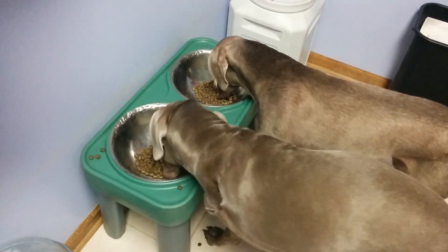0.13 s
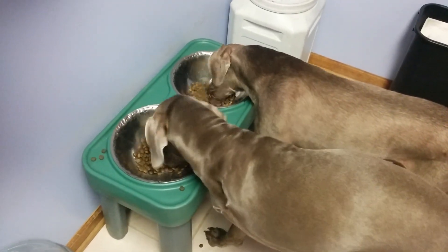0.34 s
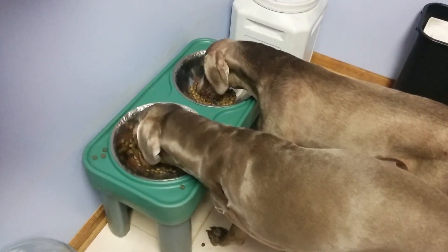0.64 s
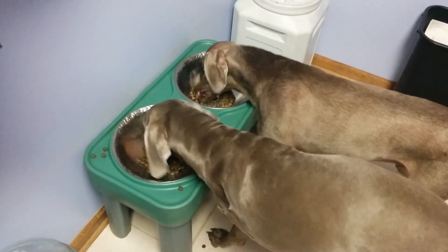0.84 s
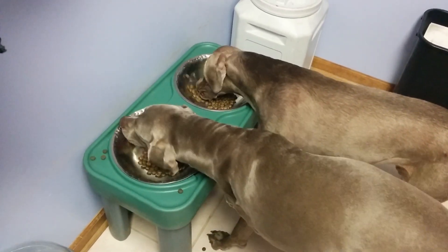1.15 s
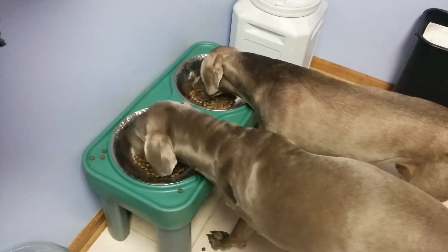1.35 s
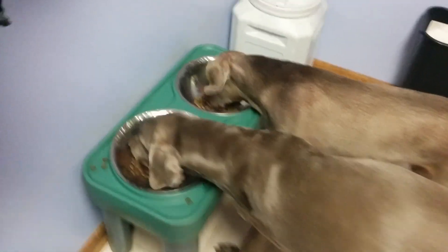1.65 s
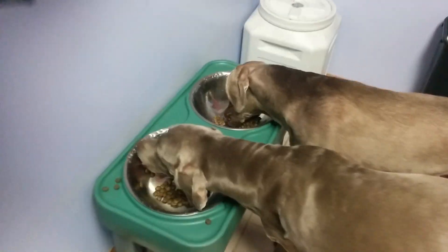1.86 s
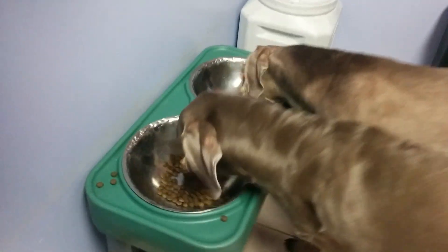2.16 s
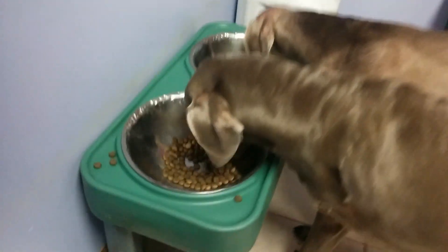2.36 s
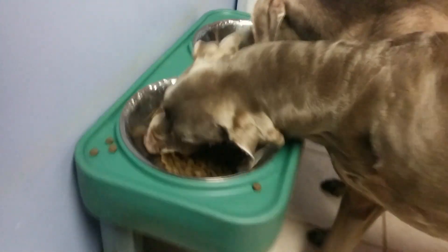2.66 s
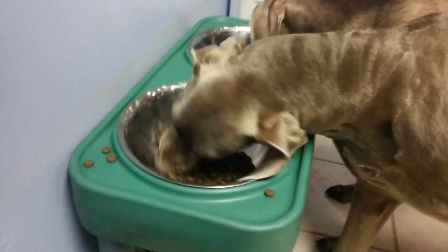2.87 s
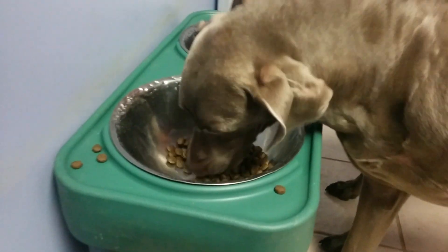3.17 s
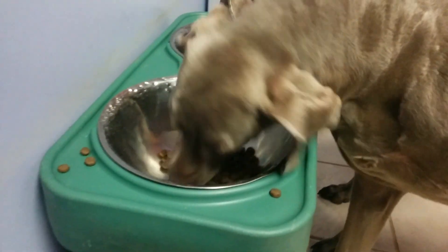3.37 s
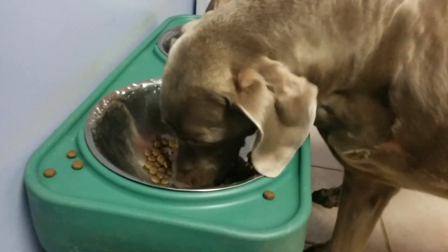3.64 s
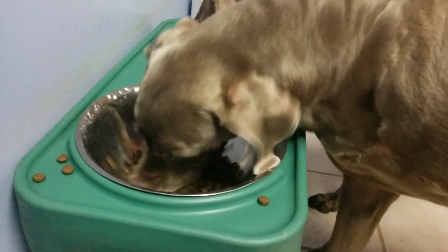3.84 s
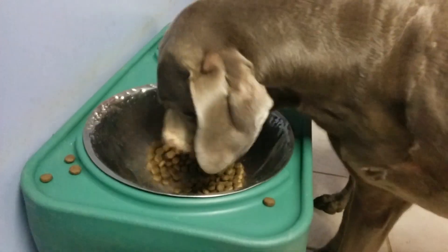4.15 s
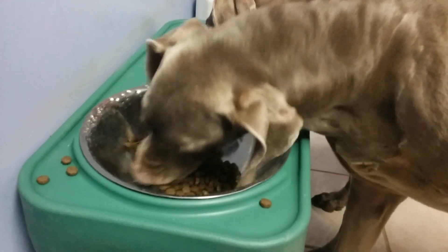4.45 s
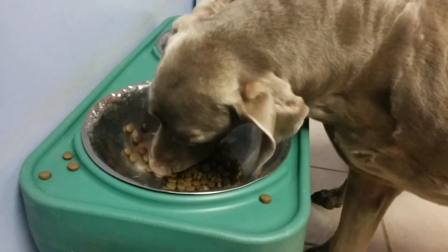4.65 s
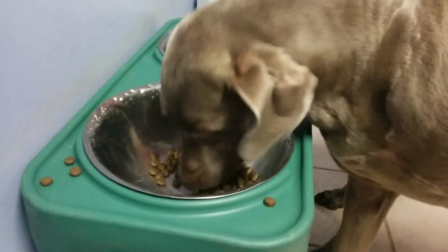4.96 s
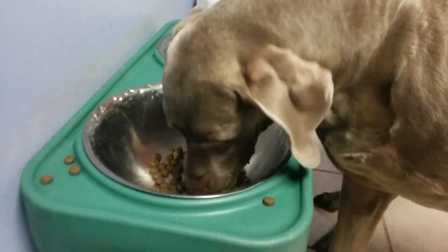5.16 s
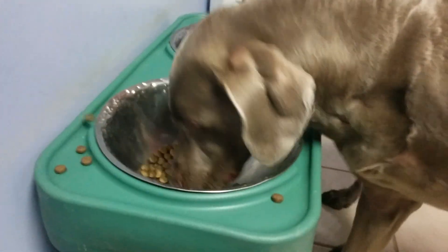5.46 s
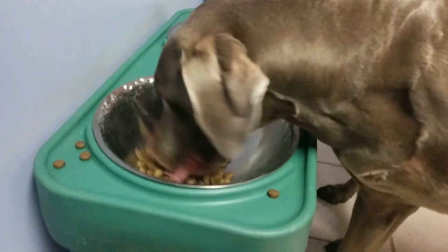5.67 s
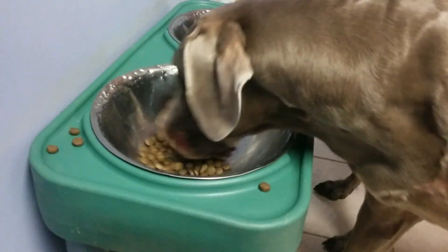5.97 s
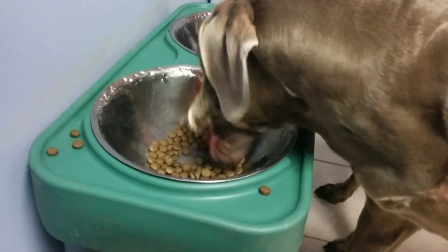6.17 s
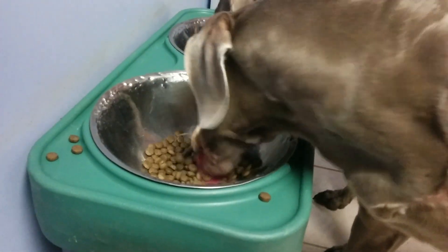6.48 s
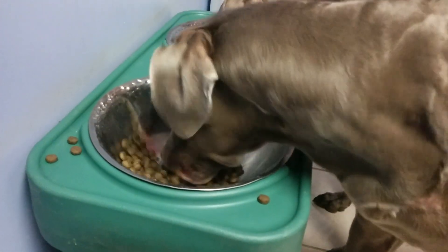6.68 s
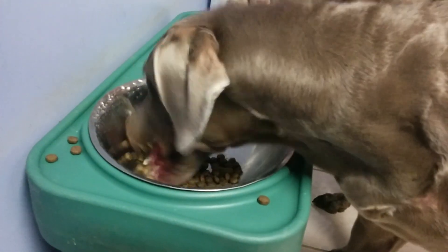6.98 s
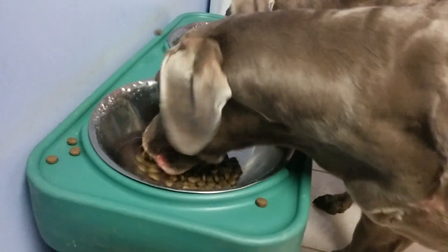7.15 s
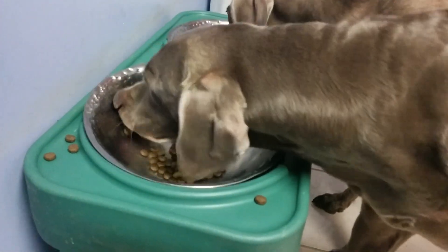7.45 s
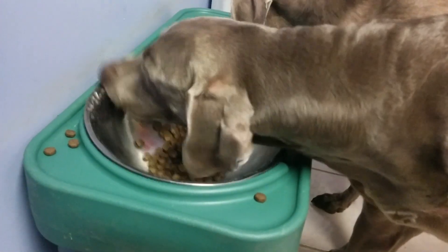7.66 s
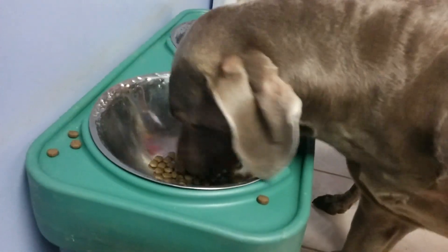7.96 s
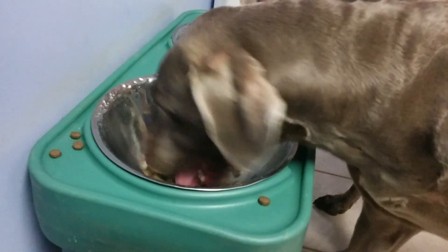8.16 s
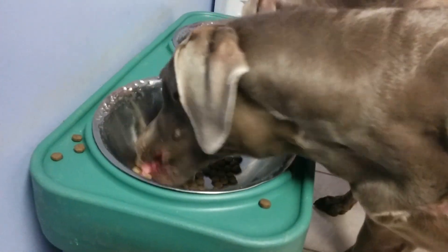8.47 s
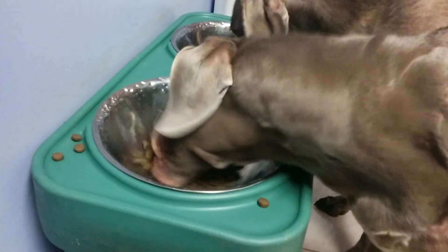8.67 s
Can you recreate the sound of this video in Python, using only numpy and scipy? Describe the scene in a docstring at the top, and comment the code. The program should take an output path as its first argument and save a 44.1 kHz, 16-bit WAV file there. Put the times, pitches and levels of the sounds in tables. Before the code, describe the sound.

Dogs eat dry kibble hurriedly from steel bowls in a hollow plastic stand, for almost nine seconds. From the start, uneven bursts of rattling pellets and dull hollow thumps follow one another several times a second, each short and damped, with grainy rubbing. Small crisp cracks dot the first two seconds; brief softer gaps fall near 0.6 and 1.4-1.6, then firmer bumps at 1.7-2.0. Around 3.0 the crunching becomes brighter and denser, with a sharp crack near 4.0 and another near 4.95, amid strong knocks at 4.5-5.3. Rattling shoves continue unevenly, with a hard bump at 6.4 and a cluster of bright crunches at 7.1-7.4. Activity loosens slightly around 8.3-8.5, then a strong clattering thump arrives near 8.75. The microphone is close, in a small tiled room with a short echo; the background hush is barely audible and drops down in pauses.

```python
"""Dogs gobble dry kibble from steel bowls, their muzzles thumping the hollow stand throughout.
Bumps ring the plastic, shoved pellets rattle the steel: random contacts excite resonant modes.
Rubbing and cracking pellets are short-ringing fragments; a small tiled room's echo and a faint hush lie behind.
A close microphone with a noise suppressor and softly clipping peaks hears it."""
import sys
import numpy as np
from scipy import signal
from scipy.io import wavfile
from scipy.ndimage import uniform_filter1d

SR = 44100
rng = np.random.default_rng(int(sys.argv[2]) if len(sys.argv) > 2 else 0)


def output_pcm(signal):
    """Save a mono or channel-first signal as 16-bit PCM at the path in sys.argv[1].

    Samples are clipped to [-1, 1] before scaling.
    """
    pcm = np.clip(np.atleast_2d(signal).T, -1, 1) * 32767
    wavfile.write(sys.argv[1], SR, np.round(pcm).astype(np.int16))


N = 388962

# single pellets cracking: start_s, level_db, loudest_hz, length_s
PELLET_CRACKS = [(0.064, -19.5, 6300, 0.038), (0.306, -20, 5300, 0.045), (0.725, -22, 5270, 0.11),
                 (0.811, -16, 5200, 0.022), (1.336, -25, 3500, 0.04), (1.749, -13, 5270, 0.044),
                 (1.92, -24, 5500, 0.044), (2.191, -24.5, 5700, 0.046), (2.453, -14.5, 4500, 0.017),
                 (2.575, -24.5, 5300, 0.11), (2.662, -21.5, 5100, 0.057), (2.735, -23, 5400, 0.06),
                 (2.817, -15, 5200, 0.045), (3.02, -12, 5950, 0.04), (3.145, -13, 5600, 0.037),
                 (3.19, -17, 4150, 0.05), (3.557, -19, 5200, 0.042), (3.72, -19, 4900, 0.038),
                 (4.034, -7, 5250, 0.02), (4.18, -29.5, 5800, 0.035), (4.272, -12, 4100, 0.029),
                 (4.415, -16, 5850, 0.058), (4.614, -13, 6200, 0.018), (4.816, -20, 5200, 0.022),
                 (4.863, -16, 4000, 0.03), (4.958, -8, 5600, 0.026), (5.266, -14, 5200, 0.033),
                 (5.512, -15.5, 5300, 0.017), (5.668, -19.5, 5900, 0.023), (5.922, -16, 5300, 0.03),
                 (6.383, -15, 5340, 0.052), (6.742, -12.5, 5500, 0.037), (6.957, -20, 5440, 0.056),
                 (7.108, -11, 6200, 0.029), (7.155, -9, 5800, 0.03), (7.358, -11, 3760, 0.034),
                 (7.52, -18, 5100, 0.07), (7.593, -16.5, 6400, 0.03), (8.097, -14, 6380, 0.04),
                 (8.229, -13.5, 4550, 0.028), (8.393, -21, 5800, 0.032), (8.658, -16, 5130, 0.066)]
# modes of the hollow plastic stand: mode_hz, level_db, t60_s
STAND_MODES = [(72.4, -2.5, 0.13), (128, -7, 0.047), (158.8, 1, .1), (212.4, 0, 0.094), (243, -7, 0.045),
               (288.8, -2.5, 0.17), (375.7, -10, 0.15), (416, -2, 0.038), (470.2, -4.5, 0.14),
               (535.3, -1.5, 0.053), (615, -2, 0.033), (720, -5, 0.017)]
# modes of the steel bowl, damped by food: mode_hz, level_db, t60_s
BOWL_MODES = [(844, 4, 0.02), (1064, 3, 0.02), (1241, 2, 0.016), (1448, -0.5, 0.018), (1607, 3.5, 0.017),
              (1777, 2, 0.038), (1924, 2.5, 0.016), (2137, -1, 0.02), (2460, -5, 0.019), (2706, 2, 0.024)]
# colour of breaking and rubbing pellets: colour_hz, level_db
PELLET_COLOUR = [(2900, -1.5), (3650, -0.5), (4300, -2), (4900, -5), (5600, 2), (6300, 3.5), (7500, -3),
                 (10400, -5), (12500, -11.5), (15800, -32)]
# shoves of muzzle and tongue through the food:
# start_s, bowl_level_db, stand_re_bowl_db, length_s (before each body's share), stand_loudest_hz, bowl_loudest_hz
FOOD_SHOVES = [(0.001, -12, 4, 0.045, 284, 1130), (0.072, -19, -4, 0.034, 450, 2570),
               (0.15, -34, -17, 0.099, 450, 1510), (0.216, -16.5, 6.5, 0.07, 430, 1250),
               (0.261, -9, 5, 0.11, 377, 1700), (0.33, -12.5, -3, 0.13, 300, 1210),
               (0.397, -11.5, 7.5, 0.062, 252, 1360), (0.441, -10, 1.5, 0.07, 220, 1220),
               (0.613, -34, -4, 0.05, 400, 1200), (0.68, -28, -26, 0.12, 590, 1920),
               (0.761, -10, 4, 0.073, 280, 1400), (0.808, -11, 10.5, 0.093, 200, 1650),
               (1.023, -22.5, 0, 0.11, 440, 1520), (1.065, -12, 8.5, 0.094, 268, 1810),
               (1.148, -13.5, -8, 0.12, 280, 1970), (1.221, -10, 2, 0.09, 590, 880),
               (1.335, -15, -8, 0.03, 490, 2000), (1.383, -31.5, 7, 0.05, 570, 1490),
               (1.494, -30, -6, 0.07, 560, 900), (1.507, -36, 14, 0.045, 160, 990),
               (1.617, -22, -14, 0.063, 550, 1900), (1.69, -8, 4.5, 0.11, 430, 1210),
               (1.847, -7, 5.5, 0.086, 314, 1210), (2.01, -11.5, 5.5, 0.091, 360, 1520),
               (2.155, -37.5, 14, 0.093, 220, 1000), (2.22, -25, -2.5, 0.11, 560, 1070),
               (2.263, -10, 1.5, 0.14, 219, 1710), (2.357, -12.5, -9, 0.081, 170, 1530),
               (2.414, -19, 3.5, 0.073, 222, 1410), (2.601, -25.5, -2.5, 0.073, 541, 1630),
               (2.664, -23.5, -21, 0.086, 570, 1560), (2.775, -13, 9.5, 0.18, 340, 1300),
               (2.884, -10, -1, 0.12, 250, 1150), (2.962, -16.5, 4, 0.08, 220, 1310),
               (3.019, -7.5, 1.5, 0.07, 560, 1530), (3.069, -10.5, 7, 0.098, 410, 1390),
               (3.14, -8.5, -4, 0.094, 338, 1830), (3.28, -26.5, -12, 0.054, 240, 1100),
               (3.361, -22, -23, 0.062, 540, 1540), (3.412, -26.5, 2, 0.041, 160, 1550),
               (3.516, -23.5, -2, 0.047, 590, 1540), (3.555, -14, 3, 0.04, 420, 1550),
               (3.589, -10.5, 6, 0.12, 490, 1080), (3.668, -12, -3, 0.098, 200, 1580),
               (3.805, -20.5, -8, 0.11, 510, 1300), (3.883, -31.5, 6, 0.19, 530, 1330),
               (3.942, -9, 8, 0.079, 523, 1240), (3.995, -10.5, 6, 0.084, 490, 1780),
               (4.148, -26, -12, 0.061, 280, 1700), (4.27, -21, -7, 0.092, 514, 1210),
               (4.339, -22, -1, 0.12, 250, 1560), (4.442, -21, 13, 0.034, 430, 1030),
               (4.464, -6.5, 4.5, 0.12, 483, 1310), (4.53, -12, 6.5, 0.032, 350, 1620),
               (4.658, -11, 9.5, 0.11, 254, 1060), (4.734, -11.5, -5, 0.088, 370, 1440),
               (4.86, -8, 7.5, 0.064, 510, 1160), (4.906, -9, 3.5, 0.057, 446, 1560),
               (4.941, -8, -8.5, 0.079, 380, 1700), (5.059, -19.5, -20, 0.066, 272, 1710),
               (5.193, -26.5, 12, 0.012, 180, 1130), (5.235, -19, -3, 0.029, 390, 1180),
               (5.263, -6, 2.5, 0.065, 218, 1120), (5.3, -10.5, 3, 0.14, 221, 1440),
               (5.41, -11, 5.5, 0.11, 221, 1520), (5.474, -11, 4, 0.076, 170, 1730),
               (5.61, -16.5, -9, 0.13, 640, 1440), (5.708, -17, -12.5, 0.063, 580, 1700),
               (5.764, -20, -6.5, 0.052, 483, 1730), (5.862, -22.5, -8, 0.11, 560, 1500),
               (5.902, -10, 8, 0.075, 223, 1430), (5.968, -10.5, 3, 0.099, 376, 1230),
               (6.142, -23, -18, 0.063, 533, 1590), (6.311, -22.5, -9.5, 0.05, 580, 2260),
               (6.372, -15.5, 5.5, 0.026, 240, 1320), (6.392, -6, 2, 0.065, 218, 1810),
               (6.501, -21, -9, 0.078, 180, 1680), (6.633, -19.5, -10, 0.086, 470, 1230),
               (6.671, -9, 1.5, 0.13, 200, 1580), (6.744, -8.5, -1.5, 0.066, 400, 1650),
               (6.87, -26.5, -6.5, 0.073, 200, 1330), (6.957, -17, -10.5, 0.099, 550, 1420),
               (7.093, -15.5, -20, 0.051, 530, 1750), (7.129, -13.5, 1.5, 0.059, 380, 1400),
               (7.177, -12, 4, 0.085, 440, 1320), (7.322, -13.5, -3, 0.15, 308, 1930),
               (7.438, -12.5, -2.5, 0.057, 526, 1150), (7.542, -21, 14, 0.087, 266, 1430),
               (7.645, -22.5, -1, 0.06, 382, 1270), (7.728, -26, -5.5, 0.11, 540, 2480),
               (7.824, -19, 6, 0.16, 458, 1150), (7.902, -9, 5, 0.15, 288, 1190),
               (8.003, -17, -2, 0.1, 220, 1610), (8.09, -19.5, 6.5, 0.063, 553, 1400),
               (8.213, -10, -25, 0.014, 560, 1070), (8.221, -13, -30, 0.045, 577, 2050),
               (8.29, -34, -8, 0.15, 520, 1700), (8.37, -32, -15, 0.03, 560, 1780),
               (8.389, -17.5, -30, 0.045, 560, 1740), (8.577, -15.5, 4, 0.2, 210, 1140),
               (8.713, -13, 6, 0.07, 410, 1120), (8.762, -6, 5, 0.074, 410, 1420)]

ENVELOPE_STEP_SAMPLES = 8
HUSH_DB = -61   # before the suppressor
ROOM_T60_S, ROOM_DB = 0.27, -10
STAND_LENGTH_SHARE, BOWL_LENGTH_SHARE, RUB_LENGTH_SHARE = 0.77, 0.94, 0.93
FOCUS_PER_DB = 0.0162   # weak events spread over more modes
RUB_HZ, RUB_DB = 4160, -8   # pellets rubbing under every shove
RUB_LAG_S = 0.0057   # the heap starts to slide just after the muzzle lands
GRIT_DB_PER_OCT, MID_BOWL_HZ = 2.5, 1500   # shoves that ring the bowl high rub more pellets
GRIT_DB_PER_DB = 0.2   # light shoves hardly rub the pellets
SUPPRESS_BELOW_DB, SUPPRESS_DB_PER_DB = -51, 0.47   # threshold at 1 kHz
SOFT_CLIP_TOP = 0.68   # full scale = 1
CUTOFF_HZ = 16000


def from_db(db):
    """Decibels to amplitude gain."""
    return 10 ** (np.asarray(db) / 20)


def rms_one(x):
    """Scale to rms 1."""
    return x / np.sqrt(np.mean(x ** 2) + 1e-20)


def drift(corner_hz):
    """Slow random wander, one value per envelope step, rms 1."""
    r = np.exp(-2 * np.pi * corner_hz * ENVELOPE_STEP_SAMPLES / SR)
    noise = rng.standard_normal(N // ENVELOPE_STEP_SAMPLES + 1)
    return rms_one(signal.lfilter([1], [1, -2 * r, r * r], noise))


def grains(per_s, spread_db):
    """Random tiny contacts of uneven size and sign."""
    size_db = spread_db * np.minimum(rng.exponential(1, N), 4)
    sizes = from_db(size_db) * rng.choice([-1, 1], N)
    return sizes * (rng.random(N) < per_s / SR) + 1e-18


def shoves(extra_db, loudest_hz, length_share):
    """Shoves as one body feels them: start_s, level_db, loudest_hz, length_s."""
    start_s, level_db, _, length_s, _, _ = np.transpose(FOOD_SHOVES)
    return np.transpose([start_s, level_db + extra_db, loudest_hz + 0 * start_s, length_share * length_s])


def mode_drive(events, modes_hz, crest_db, rise_s, lazy_db, knock, shape, focus_db, scatter_db):
    """Drive per mode: bursts open with a knock, hold and collapse; each favours modes near its own pitch."""
    start_s, level_db, loudest_hz, length_s = np.transpose(events)
    level_db, loudest_hz = level_db[:, None], loudest_hz[:, None]
    clock_s = np.arange(N // ENVELOPE_STEP_SAMPLES + 1) * ENVELOPE_STEP_SAMPLES / SR
    t_s = np.maximum(clock_s - start_s[:, None], 0)
    age = np.minimum(t_s / np.clip(length_s, .005, .3)[:, None], 5)   # in event lengths
    fall = age ** shape + (age / 2.26) ** 6   # the motion fades, then stops short
    event_rise_s = rise_s * from_db(-lazy_db * (level_db + 9.5))   # weak events swell more slowly
    swell = 1 - np.exp(-t_s / event_rise_s)
    opening = 1 + knock * np.exp(-t_s / 0.0013)
    burst_power = (swell * opening * np.exp(-fall)) ** 2

    focus = np.clip(1 + FOCUS_PER_DB * (level_db + 10), .5, 3)
    share_db = -focus_db * focus * np.abs(np.log2(modes_hz / loudest_hz))
    share_db += scatter_db * rng.standard_normal((len(start_s), len(modes_hz)))
    mode_power = from_db(level_db - crest_db + share_db) ** 2
    return np.sqrt(mode_power.T @ burst_power)


def ring_body(modes, drives, per_s, snaps, patchy_db, soft_hz):
    """Each mode has its own small contacts, sparse snaps strike all; the grip wanders, so modes come and go."""
    out = np.zeros(N)
    shared_snaps = snaps * rms_one(grains(per_s / 4, spread_db=2.0))
    for (mode_hz, level_db, t60_s), drive in zip(modes, drives):
        contacts = rms_one(grains(per_s, spread_db=3.5)) + shared_snaps
        grip = from_db(patchy_db * drift(corner_hz=10.4))
        hits = contacts * np.repeat(drive * grip, ENVELOPE_STEP_SAMPLES)[:N]
        r, w = from_db(-60 / (t60_s * SR)), 2 * np.pi * mode_hz / SR
        gain = from_db(level_db) * np.sqrt((1 - r * r) / 2)   # mode power independent of ring time
        out += signal.lfilter([gain, 0, -gain], [1, -2 * r * np.cos(w), r * r], hits)
    soft = signal.butter(2, soft_hz, fs=SR, output="sos")   # contacts are not perfectly hard
    out = signal.sosfilt(soft, out)
    return out / np.sqrt(np.sum(from_db(np.array(modes)[:, 1]) ** 2))


def hush():
    """Faint steady noise, its lows and highs filtered down."""
    noise = rng.standard_normal(N)
    return from_db(HUSH_DB) * rms_one(signal.lfilter([1, -1], np.poly([.93, .93, .6]), noise))


def room(x):
    """Short diffuse echo off tiles and walls: decaying noise starting after 4 ms."""
    t_s = np.arange(int(.4 * SR)) / SR
    tail = rng.standard_normal(len(t_s)) * from_db(-60 * t_s / ROOM_T60_S) * (t_s > .004)
    return signal.fftconvolve(x, tail / np.sqrt(np.sum(tail ** 2)))[:N]


def stand():
    """Muzzle bumps shake the modes of the hollow plastic."""
    _, _, stand_re_bowl_db, _, stand_hz, _ = np.transpose(FOOD_SHOVES)
    bumps = shoves(stand_re_bowl_db, stand_hz, STAND_LENGTH_SHARE)
    drives = mode_drive(bumps, np.array(STAND_MODES)[:, 0], crest_db=6.5, rise_s=0.0032, lazy_db=0.12,
                        knock=0.39, shape=1.31, focus_db=5.5, scatter_db=2.5)
    return ring_body(STAND_MODES, drives, per_s=400, snaps=0.28, patchy_db=3.5, soft_hz=1600)


def bowl():
    """Pellets tumbling over the steel ring its damped modes."""
    sweeps = shoves(0, np.transpose(FOOD_SHOVES)[-1], BOWL_LENGTH_SHARE)
    drives = mode_drive(sweeps, np.array(BOWL_MODES)[:, 0], crest_db=9, rise_s=0.0056, lazy_db=0.16,
                        knock=0.19, shape=1.52, focus_db=6.5, scatter_db=1.5)
    return ring_body(BOWL_MODES, drives, per_s=700, snaps=0.24, patchy_db=2.5, soft_hz=4770)


def pellets():
    """Rubbed and cracked pellets: fragments of many sizes ring a few dozen cycles each."""
    fragment_hz = np.geomspace(2950, 15700, num=26)
    colour_hz, colour_db = np.transpose(PELLET_COLOUR)
    fragment_db = np.interp(np.log(fragment_hz), np.log(colour_hz), colour_db)
    fragments = np.transpose([fragment_hz, fragment_db, 46.0 / fragment_hz])   # t60 = 46 cycles

    _, bowl_level_db, _, _, _, bowl_hz = np.transpose(FOOD_SHOVES)
    grit_db = RUB_DB + GRIT_DB_PER_OCT * np.log2(bowl_hz / MID_BOWL_HZ)
    grit_db = grit_db + GRIT_DB_PER_DB * (bowl_level_db + 10)
    rubs = shoves(grit_db, RUB_HZ, RUB_LENGTH_SHARE) + [RUB_LAG_S, 0, 0, 0]
    events = np.vstack([rubs, PELLET_CRACKS])
    drives = mode_drive(events, fragment_hz, crest_db=7, rise_s=0.0022, lazy_db=0.13,
                        knock=0.23, shape=1.93, focus_db=9.5, scatter_db=2.5)
    return ring_body(fragments, drives, per_s=1500, snaps=0.33, patchy_db=3.5, soft_hz=11000)


def scene():
    """Stand, bowl and pellets with their echo over the hush."""
    meal = stand() + bowl() + pellets()
    return (meal + from_db(ROOM_DB) * room(meal) + hush())[None]


def suppress(x):
    """Turns down each band while it is weaker than a threshold that falls towards the treble."""
    hz, _, frames = signal.stft(x, SR, nperseg=512)
    power = uniform_filter1d(np.abs(frames) ** 2, size=5, axis=0)   # over bands
    power = uniform_filter1d(power, size=3, axis=1)   # over time
    power_db = 10 * np.log10(power.clip(1e-16))
    threshold_db = SUPPRESS_BELOW_DB - 2.3 * np.log2(np.maximum(hz, 500) / 1000)[:, None]
    gain = from_db(SUPPRESS_DB_PER_DB * np.minimum(power_db - threshold_db, 0))
    return signal.istft(frames * gain, SR, nperseg=512)[1][:N]


def record(dry):
    """Microphone chain: lows cut, quiet bands pushed down, peaks rounded, top cut."""
    wet = signal.sosfilt(signal.butter(2, 80, "high", fs=SR, output="sos"), dry)
    wet = suppress(wet[0])[None]
    wet = wet / (1 + np.abs(wet / SOFT_CLIP_TOP) ** 4) ** .25
    return signal.sosfilt(signal.ellip(10, .5, 70, CUTOFF_HZ, fs=SR, output="sos"), wet)


dry = scene()
out = record(dry)
output_pcm(out)
```